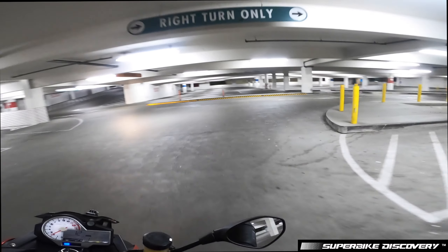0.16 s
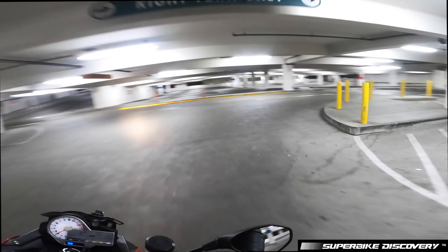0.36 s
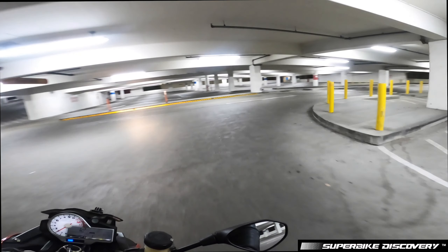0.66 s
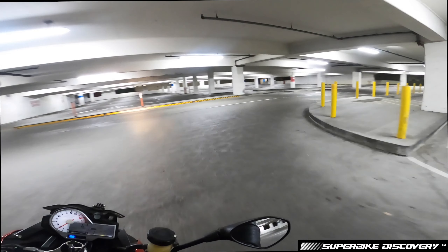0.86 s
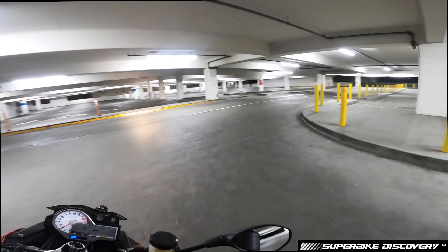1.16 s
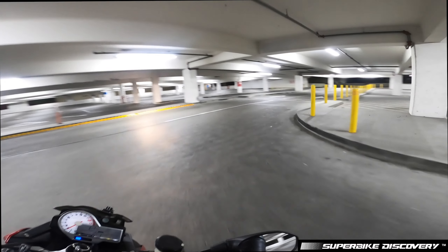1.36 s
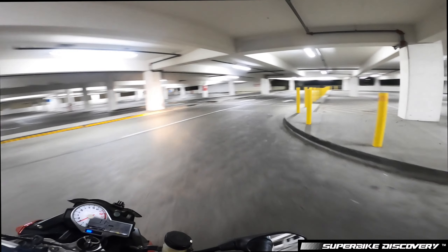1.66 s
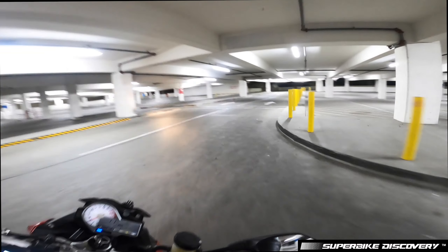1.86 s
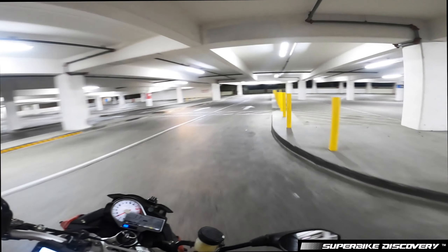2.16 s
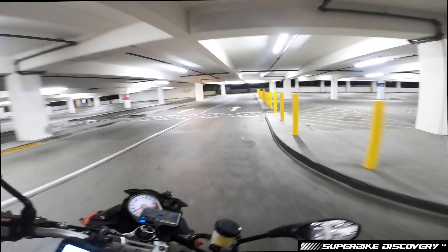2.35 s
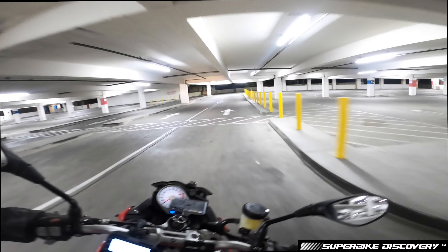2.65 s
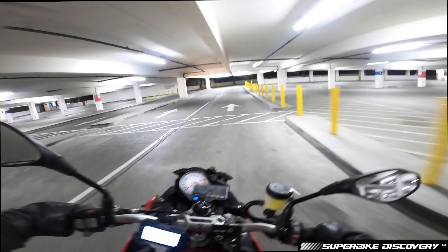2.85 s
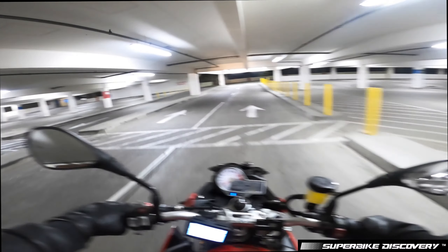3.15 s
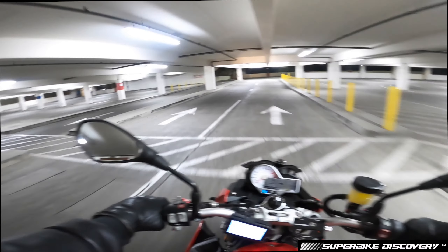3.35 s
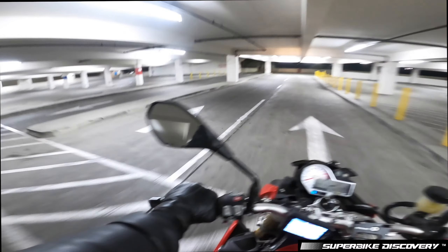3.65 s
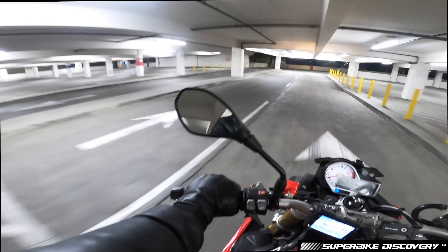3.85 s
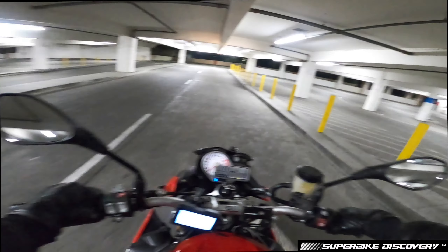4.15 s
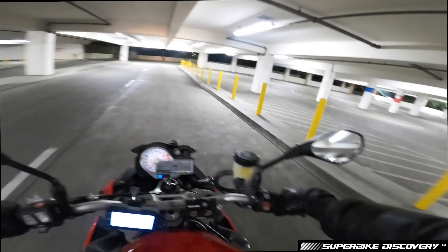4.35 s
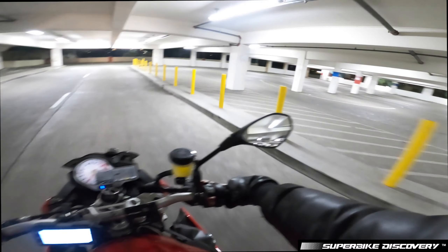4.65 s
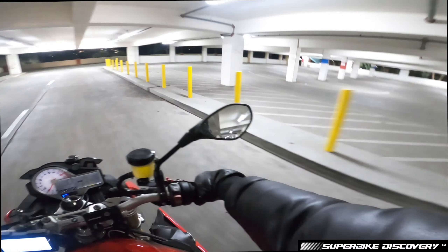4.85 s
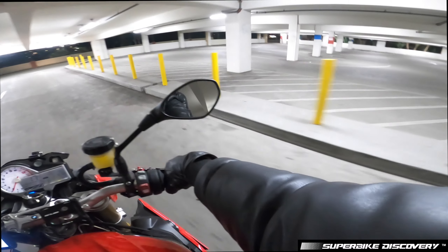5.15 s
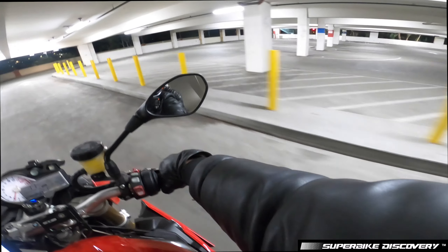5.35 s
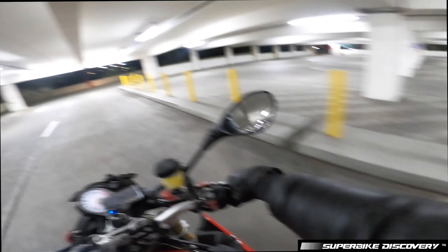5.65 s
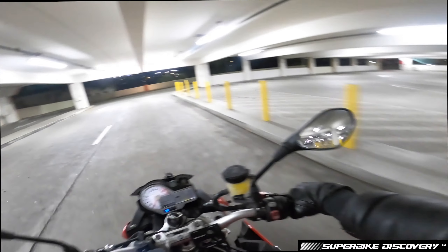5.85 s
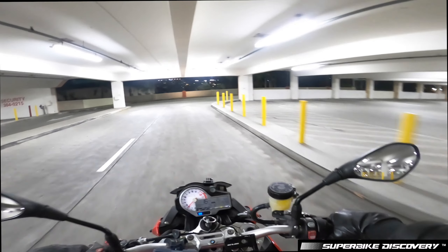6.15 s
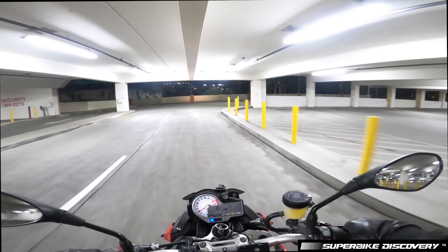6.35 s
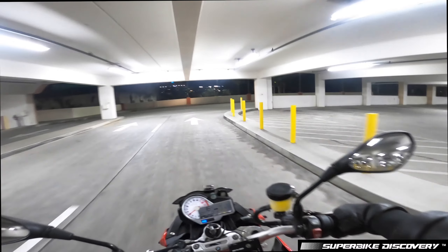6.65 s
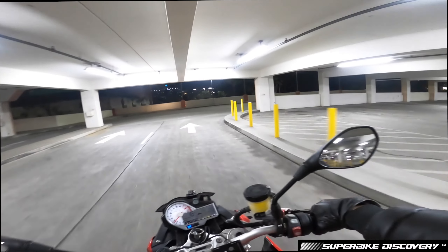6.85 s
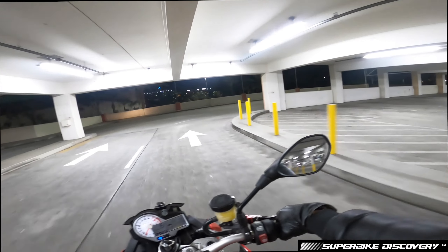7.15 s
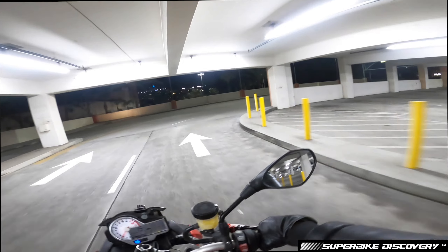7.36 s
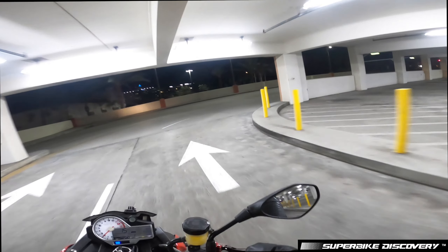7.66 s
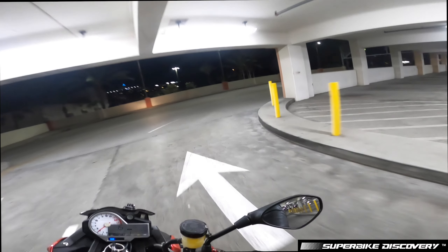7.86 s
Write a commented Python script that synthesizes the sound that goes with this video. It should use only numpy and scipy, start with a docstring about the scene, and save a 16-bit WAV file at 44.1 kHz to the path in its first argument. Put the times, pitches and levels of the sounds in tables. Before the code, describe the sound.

Heard from the rider's seat, a four-cylinder motorcycle rolls through a low concrete garage. Its droning exhaust sinks towards idle, then pulls a little with hoarse intake gulps. A quick blip soars and drops into a ragged burble with clutch chatter; a second, broader blip follows and settles to a steady hum. Gear whine, valve tapping and chain rattle run close by, over a diffuse hard-walled echo.

```python
"""A droning exhaust is heard first, just above idle: a four-cylinder motorcycle rolls slowly through a
concrete parking garage, heard from the rider's seat. It pulls a little and is blipped twice, burbling as
the revs fall. The exhaust is sines locked to the firing phase plus puffs of noise; gears are sines at
multiples of the firing rate; valves, chain, clutch, covers and airbox are noise or pulses through
resonances; one tick is a noise snap. A decaying noise tail gives the echo of the low ceiling."""
import sys
import numpy as np
from scipy import signal
from scipy.fft import rfft, irfft
from scipy.io import wavfile
from scipy.ndimage import uniform_filter1d

SR = 44100
rng = np.random.default_rng(int(sys.argv[2]) if len(sys.argv) > 2 else 0)


def int16_out(signal):
    """Quantize to a 16-bit WAV file."""
    q = np.round(np.clip(np.atleast_2d(signal).T, -1, 1) * 32767)
    wavfile.write(sys.argv[1], SR, q.astype(np.int16))


N = 352800  # 8 s

# In every table of humps the half length runs from the middle to 1/e of the height.
# Engine speed, a gentle pull and then two blips. Each row: time in seconds, speed in firings per second.
SPEED = [(0.0, 77.9), (0.11, 76.9), (0.51, 65.6), (0.78, 62.8), (1.05, 60.8), (1.27, 63.2), (1.6, 62.3),
         (1.72, 64.0), (2.2, 65.3), (2.47, 69.0), (2.78, 80.2), (3.03, 81.8), (3.21, 78.1), (3.49, 81.6),
         (3.62, 110.0), (3.72, 109.5), (3.83, 87.0), (3.96, 68.2), (4.28, 58.5), (4.55, 57.2), (4.75, 58.3),
         (4.84, 61.6), (5.0, 60.8), (5.12, 58.8), (5.34, 58.6), (5.52, 63.5), (5.7, 62.0), (5.86, 64.0),
         (5.99, 72.2), (6.13, 89.7), (6.26, 103.3), (6.42, 109.2), (6.51, 105.5), (6.79, 78.4),
         (7.11, 71.9), (8.0, 71.8)]
# Work against the wheel. Each row: time in seconds, load (0 coasting, about 1 pulling).
LOAD = [(0, 0.84), (.55, 1.07), (1.05, 0.92), (1.5, 0.89), (2.0, 1.27), (2.65, 0.63), (2.85, 0.84),
        (3.2, 1.22), (3.8, 0.073), (4.5, 0.51), (5.2, 0.3), (5.7, 0.72), (6.2, 0.41), (6.8, 0.35),
        (7.2, 0.49), (7.7, 0.77), (8, 0.84)]
# Radiation of the two lowest exhaust tones. Each row: frequency in Hz, level in dB before load and flutter.
BOOM = [(58, -24), (65, -20.5), (72, -18.5), (80, -17), (87, -23), (95, -14.5), (104, -9), (116, -14),
        (128, -14.5), (145, -13), (165, -13.5), (178, -12.5), (205, -27), (230, -22)]
# The octave tone sinks as the bike rolls through standing-wave nodes and swells between them.
# Each row: middle in seconds, half length in seconds, depth in dB (negative swells).
NODES = [(0.197, 0.066, 7.5), (0.433, 0.058, 9), (.69, 0.018, 18), (.89, 0.051, 9), (1.097, 0.093, 9),
         (1.86, 0.026, 15), (2.25, 0.11, 5), (2.514, 0.028, 12.5), (2.63, 0.041, 16), (3.844, 0.15, 11.5),
         (4.01, 0.015, 33), (4.136, 0.026, 12), (4.26, 0.022, 14), (4.33, 0.0082, 14), (4.503, 0.028, 18),
         (4.752, 0.047, 6), (5.102, 0.009, 13), (5.21, 0.022, 24), (5.39, 0.093, -4), (5.55, 0.029, 23),
         (5.65, 0.026, 9), (5.92, 0.02, 8), (6.09, 0.13, 4), (6.795, 0.14, 5), (7.49, 0.024, 6),
         (7.85, 0.16, 11.5)]
# Swelling and sinking of the third tone. Each row: middle in seconds, half length in seconds, lift in dB.
THIRD_TONE = [(0.42, 0.054, 5.5), (2.54, 0.061, 17.5), (3.11, 0.089, -11), (3.44, 0.081, -16),
              (4.5, 0.33, 5.5), (7.88, 0.14, 5)]
# Pipe response to the exhaust overtones. Each row: frequency in Hz, relative height in dB.
PIPE = [(170, 3.5), (195, -4.5), (216, 0), (236, -3), (256, 2.5), (290, 0.5), (325, 1), (372, 6),
        (420, -3.5), (470, -12), (540, -23.5), (700, -31.5), (1000, -25.5), (1600, -42.5)]
# Course of the overtone level. Each row: time in seconds, level in dB before a common trim.
BARK = [(0.0, -23.5), (0.26, -16), (0.64, -23.5), (1.88, -19), (2.3, -22), (2.37, -22.5), (2.54, -18.5),
        (2.66, -16.5), (3.1, -16.5), (3.12, -21.5), (3.54, -17.5), (4.38, -26.5), (5.0, -20), (5.35, -21),
        (5.8, -29.5), (6.2, -12.5), (6.26, -18), (7.46, -23), (7.95, -16.5)]
# Spectrum of the exhaust puffs. Each row: frequency in Hz, relative gain in dB.
RUMBLE = [(20, -25), (40, -8.5), (60, -4.5), (85, -4), (115, 4), (170, -3), (210, -6), (280, -8),
          (335, -7.5), (372, -2.5), (410, -9.5), (450, -5.5), (540, -21), (700, -26), (1100, -54),
          (4000, -110)]
# Spectrum of the case noise. Each row: frequency in Hz, relative gain in dB.
METAL = [(350, -15), (580, 2.5), (680, -8), (740, -3.5), (870, -9.5), (1150, -7), (1400, -6.5), (2100, -9),
         (2750, -9), (3450, -10.5), (4400, -11), (5600, -16.5), (7200, -25), (8600, -36.5), (10200, -39),
         (15000, -57.5)]
# Resonances of the metal case. Each row: frequency in Hz, width in Hz, relative gain in dB.
CASE_MODES = [(719, 42, -4.5), (1068, 92, 4), (1570, 11, -21.5), (1894, 46, -11), (2117, 240, -2),
              (2496, 34, -3), (2990, 130, -0.5), (3446, 170, -4), (4180, 100, -7), (4710, 100, -11)]
# Case noise in three bands. Each row: time in seconds, then knock, clatter and hiss in dB before trims.
CASE = [(0.0, -31, -27, -38), (0.2, -33, -28.5, -39.5), (0.83, -33, -31, -43), (1.76, -32, -29.5, -41.5),
        (2.22, -32, -32, -43.5), (2.53, -31.5, -30, -41), (2.68, -31, -28.5, -40),
        (2.79, -28, -30.5, -39.5), (3.28, -30.5, -30.5, -41), (3.72, -28.5, -30, -40.5),
        (3.9, -31, -31, -44.5), (4.22, -30, -29.5, -46), (4.64, -27, -30, -44.5), (5.25, -31, -30.5, -43.5),
        (5.63, -31.5, -32, -46.5), (5.9, -30, -33, -47.5), (6.27, -27, -30.5, -40.5),
        (6.73, -30.5, -34, -47), (7.9, -31.5, -31.5, -46.5)]
# Gear meshes. Each row: multiple of the firing rate, relative level in dB.
GEARS = [(11.9, -29.5), (17.7, -23), (22.3, -23), (26.3, -21.5), (30.2, -21), (35.4, -22.5), (38.5, -21),
         (39.4, -19), (45.8, -27), (53.3, -15.5), (64.6, -22), (65.9, -17.5), (71.5, -24.5)]
# The gears go quiet as the engine revs free of the wheel.
# Each row: middle in seconds, half length in seconds, drop in dB.
FREE_REVS = [(3.73, 0.2, 14), (6.35, 0.48, 20)]
# A mesh, with any close neighbour, sings out as its teeth take up strain.
# Each row: middle in seconds, half length in seconds, multiple of the firing rate, lift in dB.
STRAINS = [(0.03, 0.098, 38.5, 9.5), (0.332, 0.08, 38.5, 9), (0.37, 0.09, 53.3, 3.5),
           (1.598, 0.44, 39.4, 5), (1.9, 0.58, 53.3, 1), (1.9, 0.7, 65.9, 0.5), (2.677, 0.11, 38.5, 6),
           (4.03, 0.092, 38.5, 4), (4.044, 0.13, 26.3, 8), (5.2, 0.15, 53.3, 6), (5.473, 0.16, 53.3, 13),
           (7.25, 0.38, 65.9, 7), (7.354, 0.35, 53.3, 2.5)]
# Rattles of the slack chain. Each row: start in seconds, length in seconds, frequency in Hz, dB rms when full.
RATTLES = [(-.1, 0.18, 2070, -32), (2.6, 0.39, 2000, -35), (3.47, 0.34, 2460, -32.5),
           (3.8, 0.32, 1820, -38), (6.08, 0.41, 2270, -36.5), (7.4, 1, 1930, -37.5)]
# Ringing of the metal covers. Each row: start in seconds, length in seconds, frequency in Hz, dB rms when full.
RINGS = [(0.94, 0.061, 2960, -32.5), (1.1, 0.06, 3040, -33.5), (1.46, 0.05, 3030, -34),
         (1.58, 0.062, 3010, -36.5), (2.68, 0.12, 3060, -38), (4.25, 0.2, 2980, -36),
         (4.45, 0.24, 2940, -35), (1.2, 0.95, 758, -42), (3.9, 0.25, 2480, -39), (4.62, 0.4, 3520, -42),
         (4.8, 0.62, 1070, -36), (0.18, 0.15, 3700, -37), (0.2, 0.78, 4450, -47), (2.72, 0.35, 4180, -47),
         (3.54, 0.073, 4120, -39), (4.35, 0.28, 4180, -41), (5.0, 0.68, 4070, -42), (6.03, 0.9, 4130, -43),
         (6.22, 0.27, 4160, -40.5)]
# Clutch basket chatter at the lowest revs.
# Each row: start in seconds, length in seconds, frequency in Hz, dB rms when full.
CHATTERS = [(4.15, .6, 1256, -34.5)]
# One small hard tick. Each row: start in seconds, relative level in dB.
TICKS = [(4.5497, -15)]
# Airbox rasp at open throttle. Each row: start in seconds, length in seconds, level in dB rms when full.
PULLS = [(0, 0.5, -35.5), (2.354, 0.31, -33.5), (2.724, 0.39, -32), (7.103, 0.9, -41)]
# Intake strength of each cylinder in firing order: relative level in dB.
CYLINDERS = [3, -5, -1.5, -9]
# Hard gulps of air, mostly one engine cycle apart. Each row: start in seconds, peak in dB.
GULPS = [(2.3540, -14.5), (2.4110, -15.5), (2.4700, -16), (2.4840, -20), (2.5270, -19), (2.7920, -16.5),
         (2.8380, -20), (2.9880, -19), (3.0370, -20), (3.0860, -21)]
# Resonances of the airbox. Each row: frequency in Hz, width of each pass in Hz, relative gain in dB.
AIRBOX_MODES = [(505, 170, 4.5), (745, 81, -6.5)]

GARAGE_T60_S, CUTOFF_HZ = 1.38, 15100
CRUISE_HZ = 70  # reference firing rate


def from_db(db):
    """Amplitude gain is ten to the power of a twentieth of the level."""
    return 10 ** (np.asarray(db) / 20)


def rms_one(x):
    """Normalise the mean power to 1."""
    return x / np.sqrt(np.mean(x ** 2) + 1e-20)


def steady(x):
    """Normalise the running power over a tenth of a second."""
    return x / np.sqrt(uniform_filter1d(x ** 2, size=SR // 10) + 1e-12)


def in_time(rows):
    """Interpolate each column linearly in time."""
    s, *columns = np.transpose(rows)
    return [np.interp(np.arange(N) / SR, s, c) for c in columns]


def bumps(rows):
    """Sum Gaussian humps, each given by its middle, half length and height."""
    t = np.arange(N) / SR
    return sum(height * np.exp(-((t - s) / length) ** 2) for s, length, height in rows)


def swell(s, length, attack_s, release_s):
    """A linear rise, a hold and an exponential decay form the envelope."""
    t = np.arange(N) / SR
    rise = np.clip((t - s) / attack_s, 0, 1)
    return rise * np.exp(-np.clip((t - s - length) / release_s, 0, 20))


def gain_at(points, hz):
    """Read a spectrum's gain on a log-frequency axis."""
    pitch, db = np.transpose(points)
    return from_db(np.interp(np.log(hz + 1e-6), np.log(pitch), db))


def colour(x, points):
    """Shape a spectrum by multiplication in the frequency domain."""
    return irfft(rfft(x) * gain_at(points, np.fft.rfftfreq(N, 1 / SR)), N)


def cut(x, hz, kind, order=4):
    """A Butterworth filter bounds the band."""
    return signal.sosfilt(signal.butter(order, hz, kind, fs=SR, output="sos"), x)


def drift(rate):
    """Noise through two equal poles at rate (Hz) gives a smooth random course of rms 1."""
    step = 40  # samples between computed values
    r = np.exp(-2 * np.pi * rate * step / SR)
    noise = rng.standard_normal(N // step + 2002)
    slow = signal.lfilter([1], [1, -2 * r, r * r], noise)[2000:]  # settled part
    return np.interp(np.arange(N) / step, np.arange(len(slow)), rms_one(slow))


def uneven(firings, spread_db):
    """Cyclic variation: the gain moves to a new random value at every firing."""
    chance = np.clip(rng.standard_normal(SR), -2, 2)
    return from_db(spread_db * np.interp(firings, np.arange(SR), chance))


def resonance(x, hz, width):
    """A two-pole resonator with unit gain near its peak."""
    r = np.exp(-np.pi * width / SR)
    feedback = [1, -2 * r * np.cos(2 * np.pi * hz / SR), r * r]
    return signal.lfilter(np.array([1, 0, -1]) * (1 - r * r) / 2, feedback, x)


def swells(rows, width, attack_s, release_s):
    """Random excitation drives a resonator in two passes for a limited spell."""
    out = 0
    for s, length, hz, db in rows:
        ringing = resonance(resonance(rng.standard_normal(N), hz, width), hz, width)
        out = out + from_db(db) * swell(s, length, attack_s, release_s) * steady(ringing)
    return out


def garage(x, wet_db):
    """Dense reflections from bare concrete decay exponentially; the room already rings at the start."""
    t = np.arange(N) / SR
    tail = rng.standard_normal(N) * from_db(-60 * t / GARAGE_T60_S) * (t > .008)
    tail = tail[:SR] / np.sqrt(np.sum(tail ** 2))
    lead_in = np.pad(x, (SR, 0), "reflect")
    return x + from_db(wet_db) * signal.fftconvolve(lead_in, tail)[SR:SR + N]


def ticks():
    """Impact of hard parts: a broadband snap with fast exponential decay and a high resonance."""
    t, envelope = np.arange(N) / SR, 0
    for s, db in TICKS:
        envelope = envelope + from_db(db - 10) * (t >= s) * np.exp(-np.abs(t - s) / .0025)
    bright = cut(cut(rng.standard_normal(N), 3500, "high", order=2), 4300, "low", order=3)
    snap = envelope * rms_one(bright)
    return snap + resonance(snap, 5300, 1800)


def clutch():
    """Random impacts of the basket excite a broad resonance."""
    return swells(CHATTERS, width=360, attack_s=0.09, release_s=0.093)


def chain():
    """Random impacts of the slack chain excite a broad resonance."""
    return swells(RATTLES, width=440, attack_s=0.1, release_s=0.12)


def covers():
    """Thin metal covers ring at narrow resonances in short spells."""
    return swells(RINGS, width=130, attack_s=0.031, release_s=0.013)


def airbox(strokes):
    """The air cavity resonates hollowly when driven by intake pulses."""
    return sum(from_db(db) * resonance(resonance(strokes, hz, width), hz, width)
               for hz, width, db in AIRBOX_MODES)


def gulps():
    """The impulse response of the cavity: one hard draw of a cylinder as the throttle opens makes a pop."""
    pop = airbox(signal.unit_impulse(SR // 20))
    pop, out = pop / np.abs(pop).max(), np.zeros(N)
    for s, db in GULPS:
        start = int(s * SR)
        out[start:start + len(pop)] += from_db(db) * pop
    return out


def intake(firings):
    """A periodic pulse train of suction strokes drives the airbox while the throttle is open."""
    stroke = firings.astype(int)
    strength = from_db(CYLINDERS)[stroke % len(CYLINDERS)] * uneven(firings, spread_db=0.5)
    strokes = np.diff(stroke, prepend=0) * strength
    throttle = sum(from_db(db) * swell(s, length, attack_s=0.033, release_s=0.1) for s, length, db in PULLS)
    return throttle * steady(garage(airbox(strokes), wet_db=-7.5))


def gears(speed, firings):
    """Tooth meshing gives tones at fixed multiples of the firing rate, modulated by firing jerks and backlash."""
    ripple, waver = 0.8, 0.015  # phase swing in radians: per firing; per cycle and unit of multiple
    play = 0.82 * speed / CRUISE_HZ  # backlash smears the phase more at high revs, radians
    cycle = np.sin(2 * np.pi * firings / len(CYLINDERS))
    whines = 0
    for multiple, db in GEARS:
        strains = [(s, length, lift) for s, length, mesh, lift in STRAINS if abs(mesh - multiple) < 2]
        level_db = db + bumps(strains) + 0.5 * cycle + 4.0 * drift(11)
        jerk = ripple * np.sin(2 * np.pi * (firings + rng.random())) + waver * multiple * cycle
        phase = 2 * np.pi * multiple * firings + jerk + play * drift(60)
        whines = whines + from_db(level_db) * np.sin(phase)
    damped = cut(whines * from_db(-bumps(FREE_REVS)), 4920, "low", order=8)
    return garage(damped, wet_db=-11.5)


def case(firings, load, whine):
    """Modal response of the metal case to valve taps, the whirr of chain and clutch, and gear whine."""
    tap = (2 * firings).astype(int)  # two taps per firing, every other one weaker
    strength = from_db(0.5 + rng.uniform(-3, 3, N)[tap] - 4 * (tap % 2))
    taps = strength * np.exp(-0.33 * (2 * firings % 1))
    whirr = rms_one(rng.standard_normal(N) * np.hypot(1, taps))
    drive = whirr + from_db(-2.0) * whine
    modes = sum(from_db(db) * resonance(drive, hz, width) for hz, width, db in CASE_MODES)
    rung = whirr + from_db(-3.0) * whine + modes
    sound = garage(colour(rung, METAL), wet_db=-11.5)
    knock = cut(sound, [520, 1600], "band")
    clatter = cut(sound, [1600, 4500], "band")
    hiss = cut(sound, 4500, "high", order=6)
    # the hiss dulls off load
    sizzle = colour(hiss, [(5400, -25), (6200, 0), (8000, 0), (9000, -25)])
    hiss = hiss - sizzle + from_db(5 * (load - 0.8)) * sizzle
    knock_db, clatter_db, hiss_db = in_time(CASE)
    bands = from_db(knock_db - 1.0) * steady(knock)
    bands = bands + from_db(clatter_db - 0.5) * steady(clatter)
    bands = bands + from_db(hiss_db + 2.0) * steady(hiss)
    return from_db(-1.17) * bands


def burble(speed, firings, load):
    """Turbulent puffs at each firing radiate broadband noise, strongest at high revs with the throttle shut."""
    puffs = rng.standard_normal(N) * np.exp(-3.53 * (firings % 1))
    level_db = -19.2 - 5 * load + 0.5 * np.log2(speed / CRUISE_HZ)
    rumble = steady(garage(colour(puffs, RUMBLE), wet_db=3.5))
    bass = colour(rumble, [(108, 0), (140, -25)])
    return from_db(level_db) * (rumble - bass + from_db(-7 * load) * bass)  # load clears the bass first


def bark(speed, firings, load):
    """Harmonics of the exhaust pulses slide through pipe resonances: round under load, raspy when coasting."""
    tilt_db = 16.5 - 27.5 * load  # per octave
    out = 0
    for k in np.arange(16) + 3:  # harmonics of the firing rate
        phase = 2 * np.pi * (k * firings + rng.random()) + 0.039 * k * drift(35)
        octaves = np.log2(np.minimum(k * speed, 450) / 300)
        standing_db = bumps(THIRD_TONE) if k == 3 else 0
        level_db = tilt_db * octaves + standing_db + 2.43 * drift(11.7)
        out = out + gain_at(PIPE, k * speed) * from_db(level_db) * np.sin(phase)
    out = steady(out) * uneven(firings, 6.0 * np.clip(.7 - load, 0, 1))  # ragged off load
    smeared = steady(garage(out, wet_db=4.0 - 22.5 * load))  # direct under load
    return from_db(in_time(BARK)[0] - 2.03) * smeared


def drone(speed, firings, load):
    """Periodic firing radiates a fundamental and octave, even under load; unequal cylinders add a tone between."""
    turn, slack = 2 * np.pi * firings, np.clip(1.2 - load, 0, 1.2)
    first_db = -2.5 - 0.5 * (load - .6) + 2.5 * slack * drift(9.1)
    first = gain_at(BOOM, speed) * from_db(first_db) * np.sin(turn + 0.8 * drift(1.9))
    second_db = 5.0 * (load - .6) - bumps(NODES) + 3.0 * slack * drift(18)
    stumble = 0.43 * slack * drift(15)  # radians
    second = gain_at(BOOM, 2 * speed) * from_db(second_db) * np.sin(2 * turn + stumble)
    lope = from_db(-25.0 - 7.5 * load) * np.sin(1.5 * turn + 0.85 * drift(13.0))
    return np.sqrt(2) * (first + second + lope)


def scene():
    """Superposition: engine speed times the firing parts, and load colours the exhaust and the hiss."""
    speed, = in_time(SPEED)
    load, = in_time(LOAD)
    firings = np.cumsum(speed) / SR  # firings so far
    loose_parts = ticks() + clutch() + chain() + covers()
    air = gulps() + intake(firings)
    engine = case(firings, load, gears(speed, firings))
    exhaust = burble(speed, firings, load) + bark(speed, firings, load) + drone(speed, firings, load)
    return (loose_parts + air + engine + exhaust)[None]


def record(dry):
    """Soft saturation rounds the highest peaks and a steep low-pass removes the extreme treble."""
    rounded = dry / (1 + (np.abs(dry) / .85) ** 6) ** (1 / 6)
    return cut(rounded, CUTOFF_HZ, "low", order=14)


dry = scene()
out = record(dry)
int16_out(out)
```